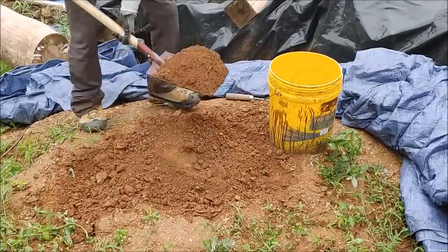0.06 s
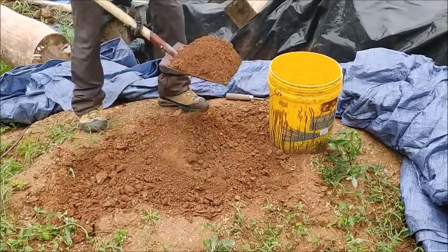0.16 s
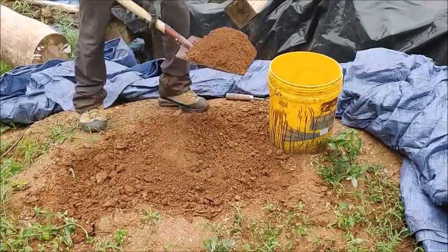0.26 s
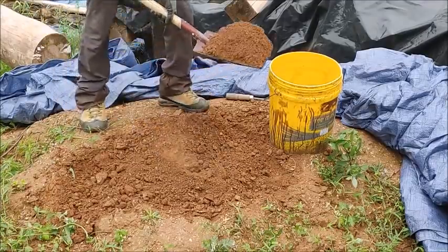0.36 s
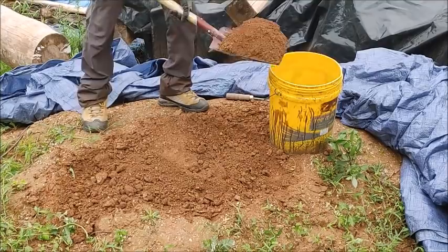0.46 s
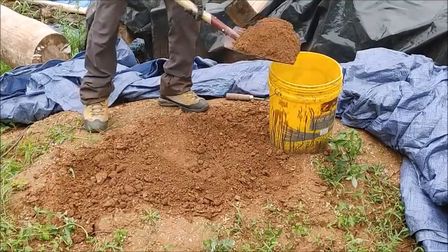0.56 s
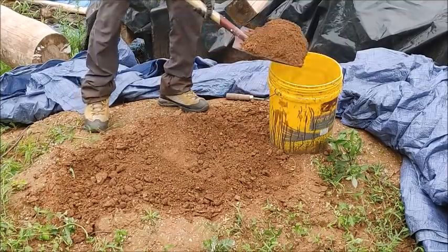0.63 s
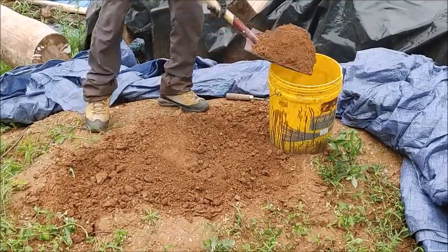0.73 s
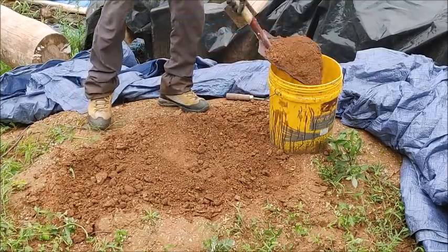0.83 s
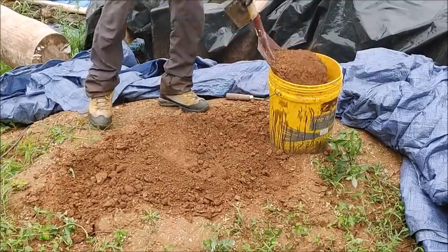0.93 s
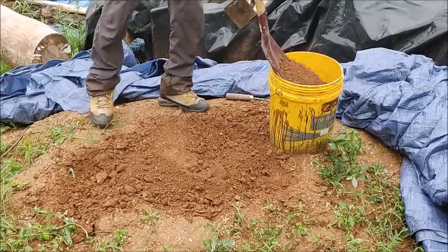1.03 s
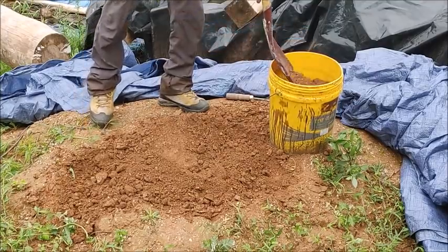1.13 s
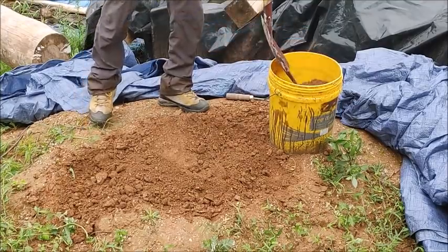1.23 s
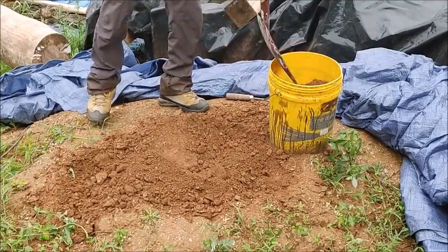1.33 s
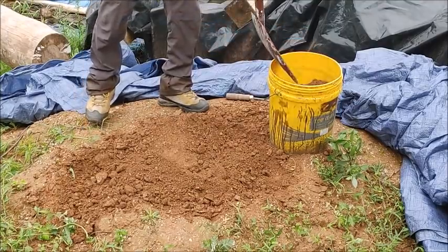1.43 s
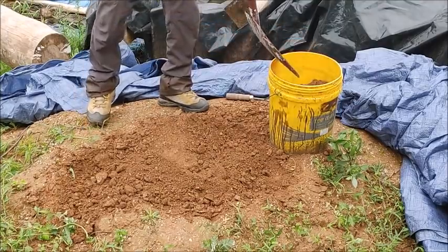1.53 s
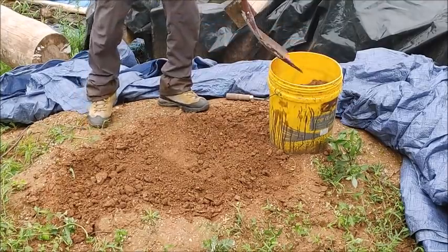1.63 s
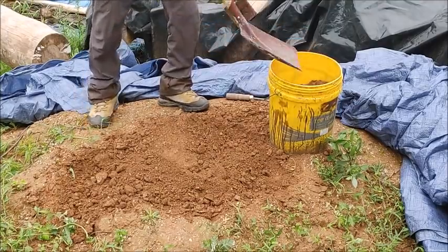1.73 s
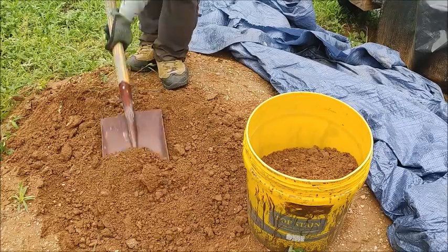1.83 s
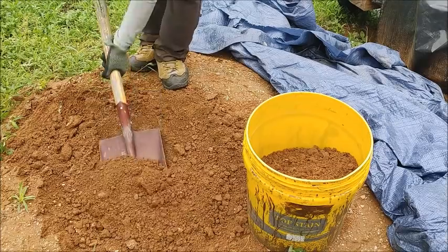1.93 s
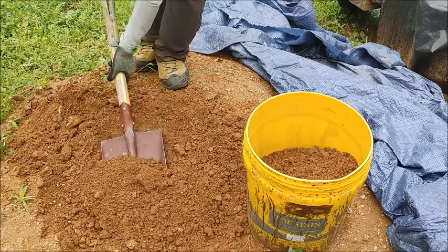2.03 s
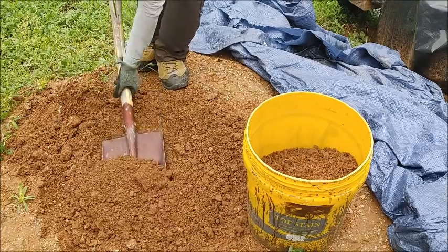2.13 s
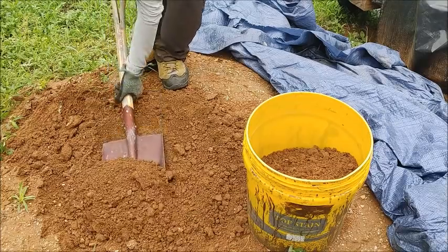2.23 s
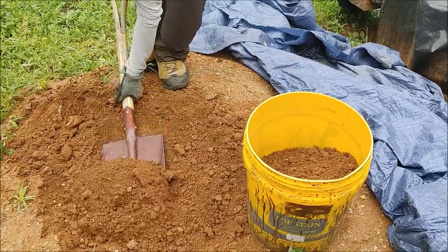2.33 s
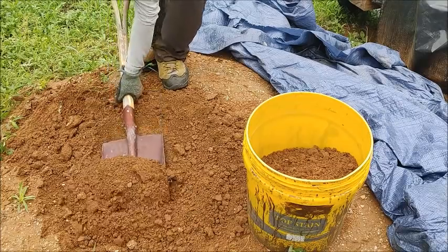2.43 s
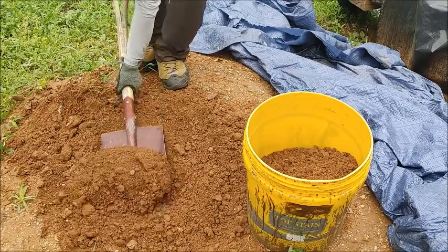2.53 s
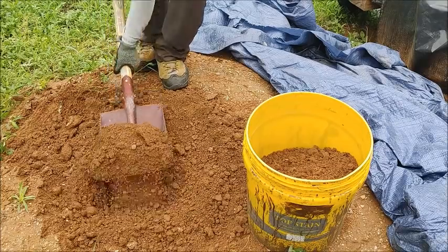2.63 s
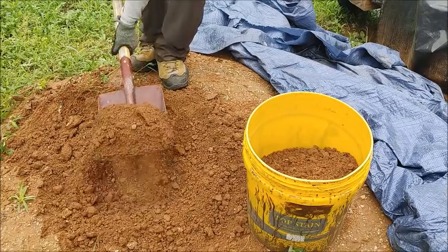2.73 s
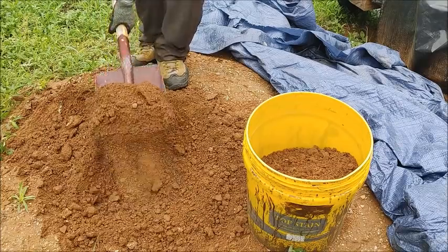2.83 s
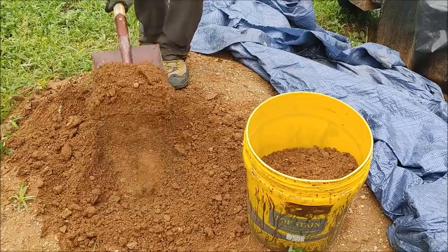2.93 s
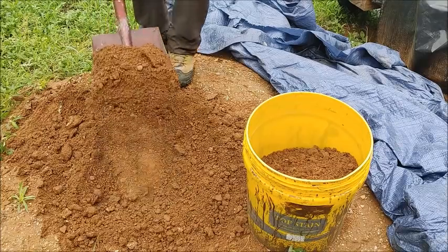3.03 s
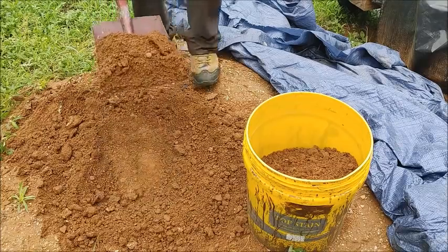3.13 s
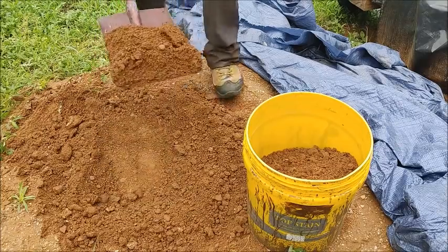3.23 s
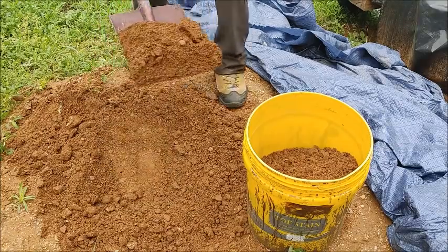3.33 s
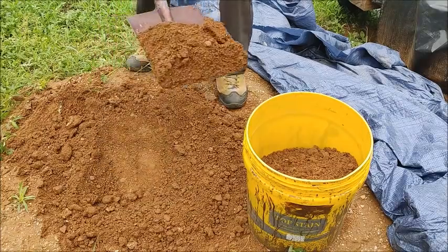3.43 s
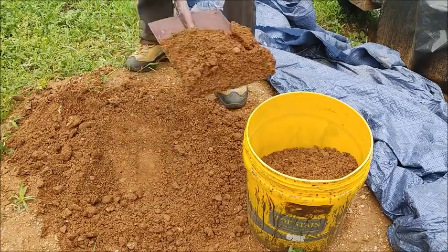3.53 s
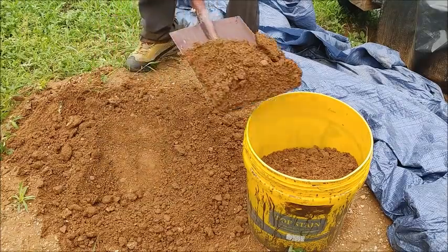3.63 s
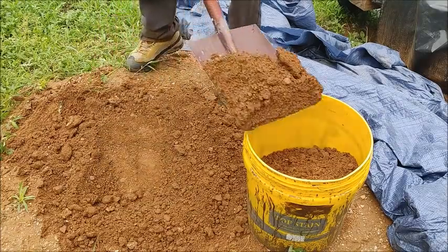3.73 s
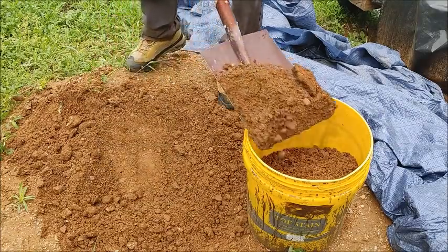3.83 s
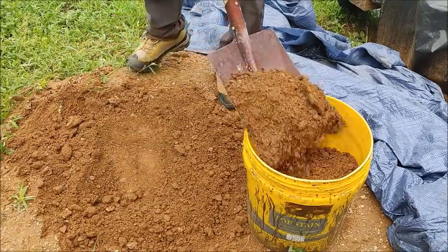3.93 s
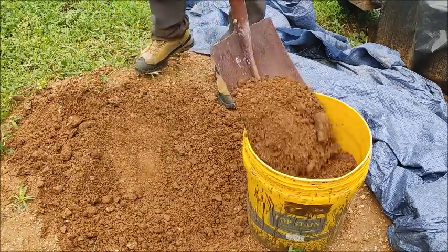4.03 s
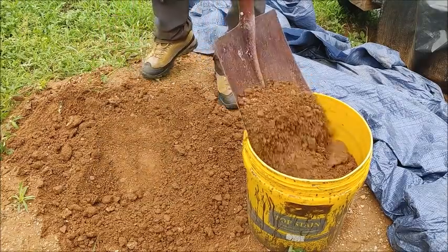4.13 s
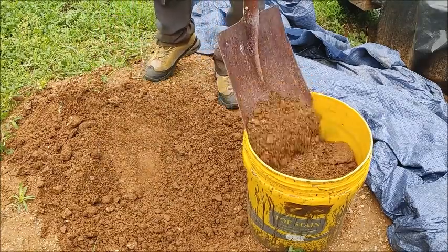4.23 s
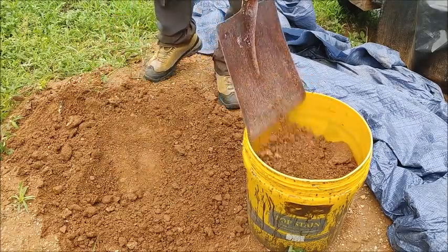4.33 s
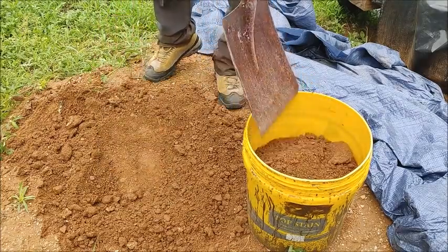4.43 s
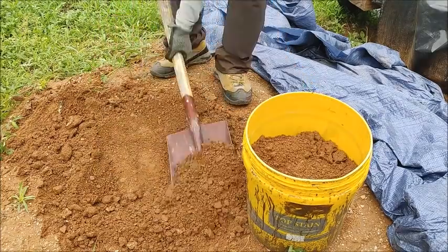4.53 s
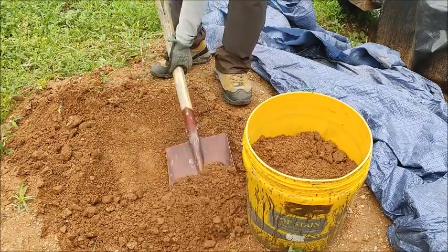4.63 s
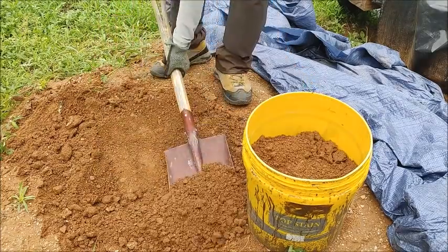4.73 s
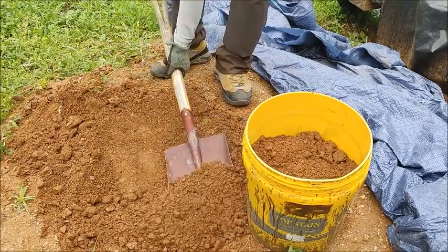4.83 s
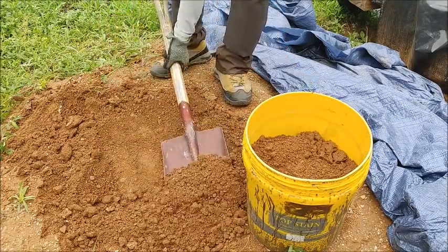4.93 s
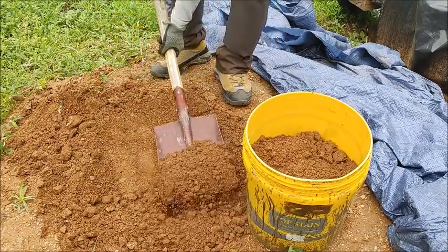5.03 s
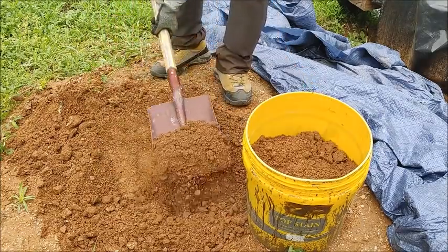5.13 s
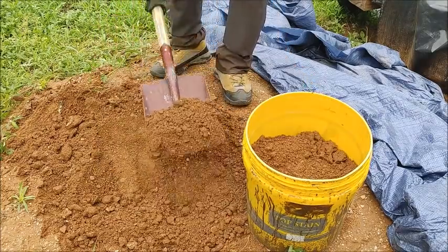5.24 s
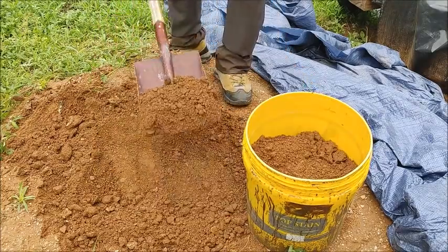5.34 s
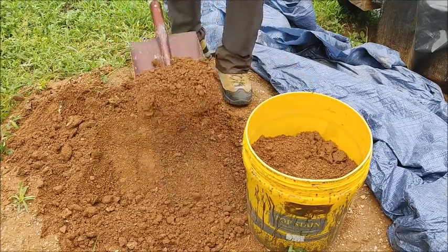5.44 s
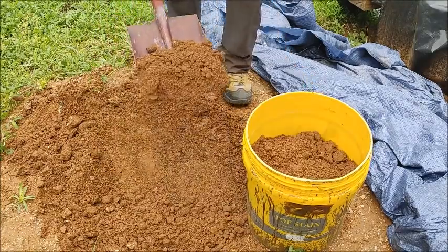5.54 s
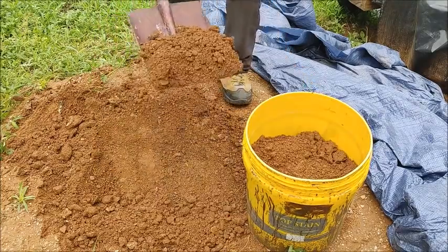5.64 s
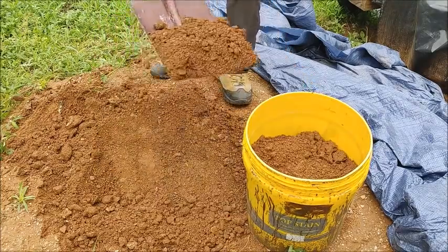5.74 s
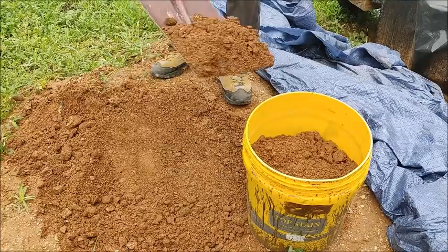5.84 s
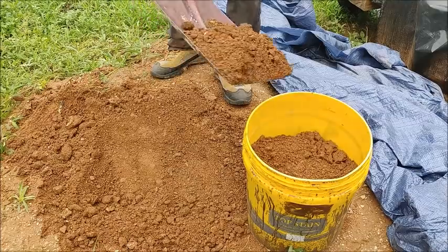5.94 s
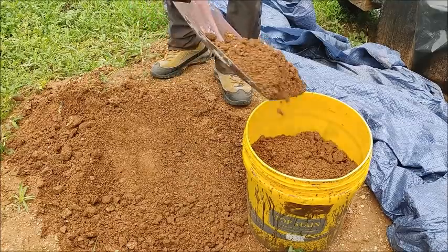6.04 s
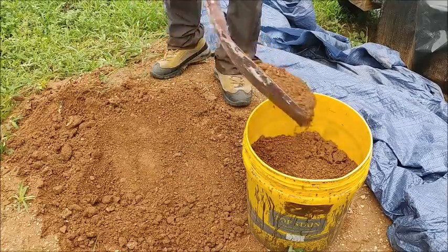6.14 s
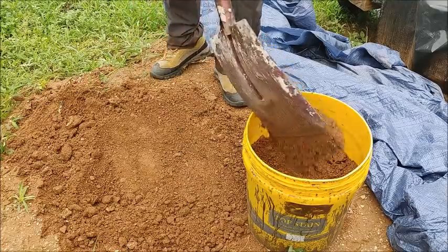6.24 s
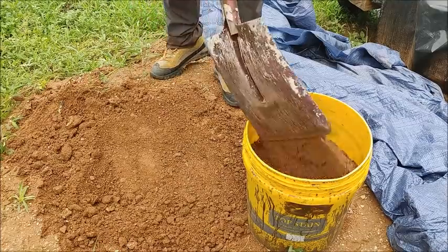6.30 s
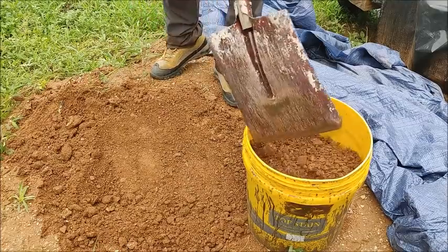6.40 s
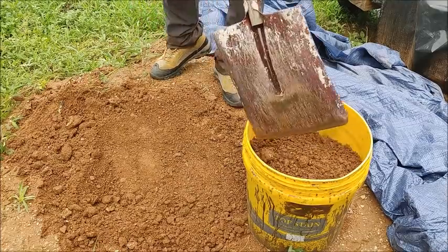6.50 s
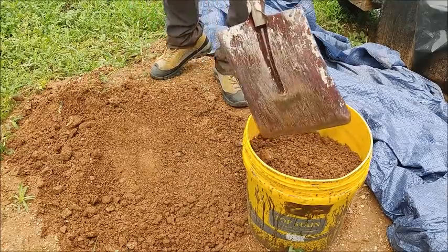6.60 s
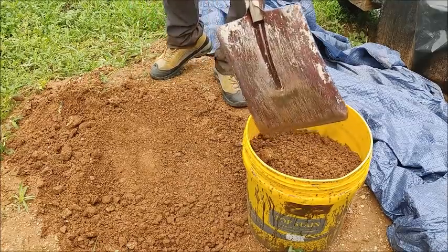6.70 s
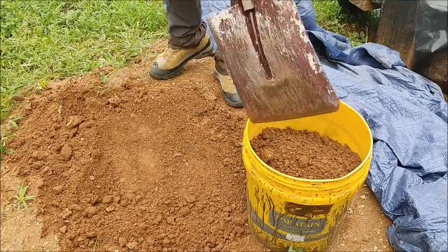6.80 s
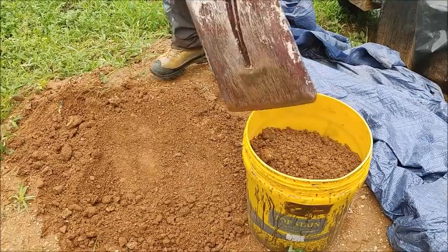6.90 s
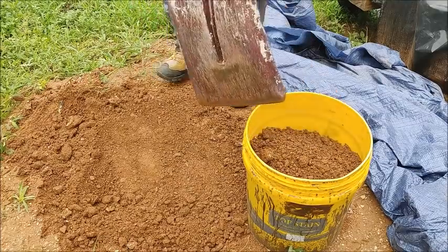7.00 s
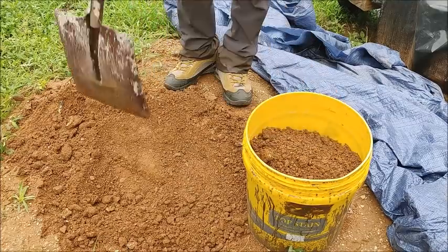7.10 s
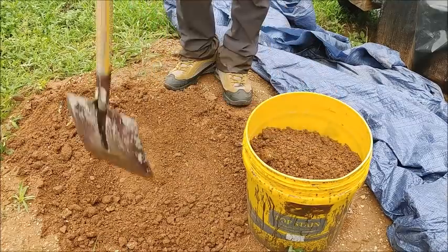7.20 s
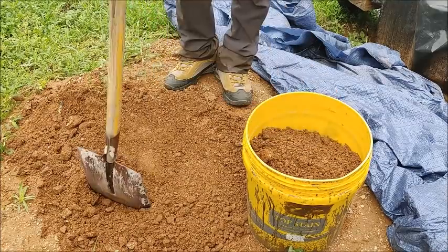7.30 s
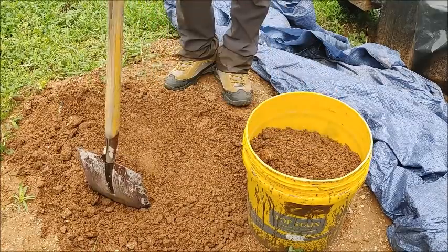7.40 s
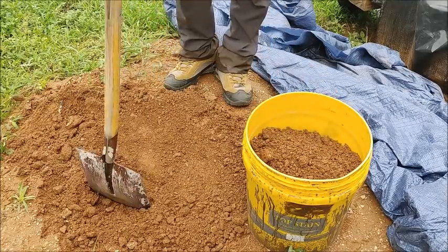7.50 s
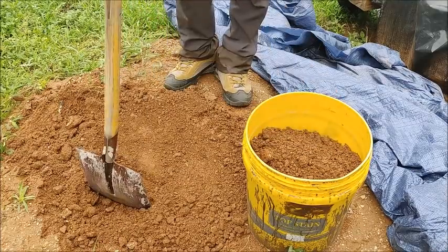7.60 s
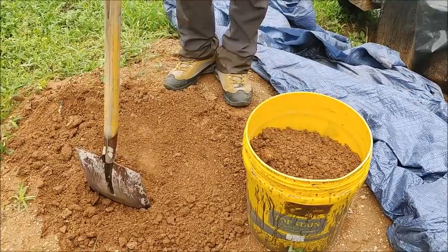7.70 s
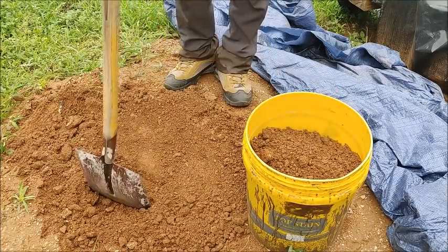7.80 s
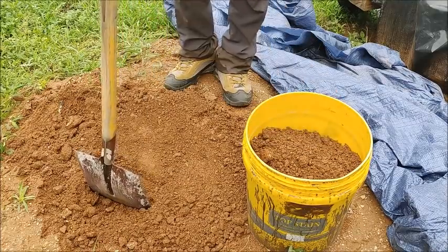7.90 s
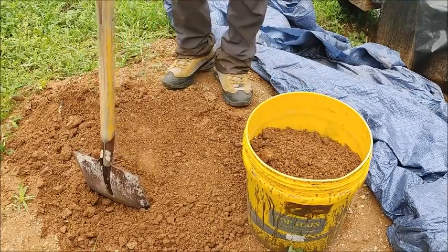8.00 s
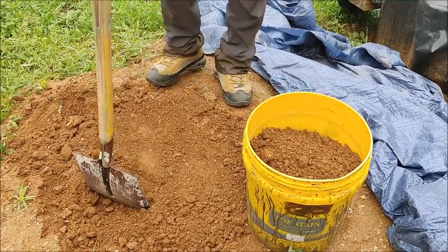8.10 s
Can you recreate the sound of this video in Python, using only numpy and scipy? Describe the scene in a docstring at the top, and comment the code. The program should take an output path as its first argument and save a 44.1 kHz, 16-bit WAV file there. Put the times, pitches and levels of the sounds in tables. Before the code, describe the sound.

Fine insect trilling and a soft airy chorus fill an open yard. In front, three shovel loads of dry soil slide from steel and rattle into a plastic bucket, with small clods knocking and clacking. After each pour the blade crunches into sandy soil; the first and last thrusts scrape over stones, the middle one is softer. A faint metallic ring trails the third pour. Near, dry sound with little echo.

```python
"""Outdoors, a steel shovel tips three loads of dry sandy soil into a plastic bucket, and digs in after each.
Clumped random clicks, coloured and resonated, make the hiss of soil, its patter and the rasp of the thrusts.
Lumps thud and knock as short bursts of such clicks; decaying sines ring the emptied blade and jolt the shovel.
Insects trill in narrow noise bands chopped by wing strokes, over a streaky hiss of a distant chorus that now
and then swells near 1.6 kHz, and a few faint far calls of swelling narrow noise."""
import sys
import numpy as np
from scipy import signal
from scipy.io import wavfile
from scipy.ndimage import uniform_filter1d

SR = 44100
rng = np.random.default_rng(int(sys.argv[2]) if len(sys.argv) > 2 else 0)


def dump_mix(stems):
    """Bounce the given channels to the path in sys.argv[1] as a 16-bit WAV at rate SR."""
    frames = np.atleast_2d(stems).T  # one column per channel
    limited = np.clip(frames, -1, 1)  # hard clip at full scale
    pcm = np.round(limited * 32767).astype(np.int16)
    wavfile.write(sys.argv[1], SR, pcm)


N = 359856
TIME = np.arange(N) / SR  # seconds
EDGE_HZ = 15850  # upper band limit of the whole scene

# near insects: (start [s], pitch [Hz], band width [Hz], mean wing stroke rate [1/s], level before panning [dB])
INSECTS = [(-1, 6310, 190, 27.1, -62), (1.8, 6280, 80, 27.25, -59.5), (1.67, 6675, 46, 26.2, -62),
           (0.71, 6330, 440, 16, -65.5)]
STROKE_DEPTH, STROKE_SHARPNESS = .7, 2.5  # share of the amplitude that pulses, and how peaked each pulse is
STROKE_EVENNESS = .8  # 0 keeps the noise's own swells, 1 flattens them

# colour of the far chorus: (frequency [Hz], relative density [dB per Hz])
CHORUS_COLOUR = [(30, -16.5), (110, -27.5), (270, -17), (1270, -18.5), (1420, -5), (1620, -3.5), (2150, -7),
                 (2900, -0.5), (3600, -1), (4000, 3.5), (4450, -2), (5300, -6.5), (6400, -1), (7400, -11),
                 (8600, 1.5), (9400, -7.5), (12000, -13), (12800, -23.5), (15500, -25.5)]
# gain of the chorus's top treble: (time [s], gain [dB])
SHEEN = [(0, -14), (.45, -7.5), (.65, -1.5), (1.5, -9.5), (1.9, -0.5)]
CHORUS_DB = -55
SWELL_DB, SWELLS_PER_S = 0.51, 2.2  # the chorus wavers slowly

# faint far calls, perhaps of birds, and two brief swells of the far chorus near 1.6 kHz: (time [s], length [s],
# pitch [Hz], band width [Hz], level before the swell [dB])
FAR_CALLS = [(0.419, 0.11, 4400, 300, -58.5), (1.297, 0.18, 4530, 506, -58), (1.793, 0.15, 4640, 400, -59),
             (2.728, 0.27, 1635, 100, -64), (4.774, 0.25, 2360, 25, -65), (5.199, 0.25, 1640, 120, -66),
             (7.625, 0.22, 3900, 201, -65), (7.637, 0.19, 4600, 400, -59)]

# soil slips off the tilted blade, each load in two parts; levels are before the mix:
# (time [s], rise [s], slide run-out [s], slide [dB], patter on the wall [dB], patter on the bottom [dB])
POURS = [(.89, 0.17, 0.41, -53.5, -61, -53), (1.16, 0.057, 0.33, -59, -67, -73),
         (3.983, 0.076, 0.37, -52.5, -48, -50), (4.11, 0.15, 0.65, -51.5, -51, -49),
         (6.193, 0.1, 0.45, -49.5, -59.5, -53), (6.384, 0.025, 0.37, -52.5, -49, -70)]
RUN_OUT_SHAPE = 1.84  # the flow holds at first, then dwindles fast
FALL_S = 0.15  # from the blade to the bottom of the bucket
SETTLE = 0.76  # length of the bottom patter's ending relative to the slide's
LUMPY_DB, LUMPS_PER_S = 2.2, 45  # the soil arrives in uneven lumps
SPURT_DB, SPURTS_PER_S = 1.1, 110  # it leaves the blade in small spurts
# colour of the sliding soil, also of the clods' ticks: (frequency [Hz], relative density [dB per Hz])
SLIDE_COLOUR = [(300, -44), (1100, -18.5), (1700, 4), (2800, 4.5), (4200, 2), (6300, 0), (7400, -2),
                (8500, 2.5), (11700, -2.5), (13000, -16.5), (15500, -17.5)]
# colour of soil in the hollow bucket: (frequency [Hz], relative density [dB per Hz])
HOLLOW_COLOUR = [(150, -30), (400, -17), (630, -20.5), (740, -13), (1130, -6), (1550, 0), (1900, -5.5),
                 (2200, -8), (3200, -1), (4500, -13.5), (8000, -46)]
# modes of the bucket: (pitch before tuning [Hz], width before tuning [Hz], lift [dB])
BUCKET_MODES = [(530, 42, 9.5), (765, 45, 12), (1003, 40, 3), (1285, 42, 7), (1575, 65, 7), (1775, 60, 8.5)]
# the bucket is retuned as it fills: (from time [s], pitch [ratio])
BUCKET_TUNING = [(0, 1.19), (3.5, 1.0), (6, .97)]
# modes of the steel blade, damped by soil: (pitch before tuning [Hz], width before tuning [Hz], lift [dB])
BLADE_MODES = [(472, 43, 9.5), (515, 21, 4.5), (1017, 78, 9), (1890, 20, -12), (2490, 46, 3),
               (2740, 27, -1), (2970, 68, -6), (3140, 120, -2), (3570, 67, 1.5), (3840, 32, -10),
               (3950, 21, 5), (4240, 12, -8), (4200, 34, -16)]
# the load of soil retunes the blade from stroke to stroke: (from time [s], pitch [ratio])
BLADE_TUNING = [(0, 1.04), (1.8, 1.02), (3.5, 1.3), (4.56, 1.05), (6, 1.035), (7.2, 0.96)]

# single crumbs: rate, range of sizes, level within the pour, sharpness and range of their pitches
CRUMBS_PER_S, CRUMB_SPREAD_DB, CRUMB_DB, CRUMB_Q = 300, 12, -2.7, 15
CRUMB_LOW_HZ, CRUMB_HIGH_HZ = 1410, 5160

# a mass of soil lands or stops the blade, or a boot treads:
# (time [s], rise [s], 60 dB decay [s], level before the force's own rms [dB], pitch [Hz])
THUDS = [(1.071, 0.0051, 0.2, -55.5, 217), (1.089, 0.0043, .08, -54.5, 220), (1.173, 0.002, 0.02, -57, 420),
         (1.963, 0.0084, 0.05, -54.5, 315), (3.03, 0.0054, 0.22, -73, 410), (3.362, .003, 0.15, -73, 378),
         (4.072, 0.018, 0.11, -48.5, 333), (4.103, 0.0018, 0.057, -32.5, 295),
         (4.1032, 0.0012, 0.063, -36.5, 600), (4.26, 0.018, 0.08, -58.5, 555),
         (4.41, 0.0097, 0.44, -61, 296), (6.17, .002, 0.044, -72, 530), (6.399, 0.0048, 0.14, -64, 454),
         (6.503, 0.0029, .1, -60, 455), (7.354, 0.0086, 0.1, -46, 343)]
# colour of a soft thud: (frequency [multiple of its pitch], relative density [dB per Hz])
THUD_COLOUR = [(.1, -45), (.48, -16), (.75, 6.5), (1.002, 3), (1.8, -10.5), (3, -21), (8, -41)]

# clods burst on the bucket or under the blade; levels are before the force's own rms:
# (time [s], 60 dB decay [s], knock [dB], knock pitch [Hz], clack [dB], clack pitch [Hz], gritty tick [dB])
CLODS = [(1.089, 0.19, -47, 1230, -52, 3000, -49), (1.173, 0.0081, -34, 1670, -37, 2900, -37.5),
         (1.177, 0.012, -48, 1100, -42, 2930, -44), (1.193, 0.051, -45, 1490, -58, 3300, -55),
         (1.255, 0.089, -46, 2040, -43, 3650, -53), (1.304, 0.071, -46.5, 1520, -45.5, 2790, -65),
         (1.892, 0.037, -33, 1550, -27.5, 2850, -42), (1.936, 0.084, -44, 1750, -37, 2540, -36),
         (1.945, 0.069, -38, 900, -47, 1340, -48), (1.957, .03, -49, 1500, -47, 2700, -46),
         (1.975, 0.054, -39, 940, -39, 1480, -48), (1.987, .03, -49, 905, -49, 1590, -47),
         (4.06, 0.14, -54, 1440, -39.5, 3320, -55), (4.1033, 0.057, -35.5, 1000, -40, 2930, -35),
         (4.298, 0.053, -51, 1740, -47, 2900, -39.5), (4.338, 0.11, -44.5, 1660, -49, 3000, -41),
         (4.4371, 0.02, -32.5, 1320, -34.5, 3600, -43), (4.442, 0.037, -35, 1530, -39, 3170, -48.5),
         (4.461, 0.068, -36.5, 1480, -45, 2985, -58), (4.504, 0.035, -43, 1260, -58, 3000, -60),
         (4.58, 0.053, -44, 1460, -38, 2500, -38), (4.648, 0.047, -54, 780, -55, 1700, -55),
         (4.67, 0.087, -49, 764, -46.5, 1330, -51), (4.71, .06, -55, 750, -58, 2700, -57),
         (4.736, 0.033, -64, 684, -55, 1700, -64), (6.1686, 0.054, -49.5, 1060, -47, 2210, -57),
         (6.177, 0.094, -45.5, 1510, -44, 3200, -54), (6.259, 0.032, -41.5, 1520, -62, 2050, -54),
         (6.399, 0.034, -38, 1594, -48, 4100, -48), (6.422, 0.054, -46, 1780, -54, 2980, -36),
         (6.428, 0.06, -38, 1770, -54, 2830, -34), (6.447, 0.072, -40.5, 1540, -43, 2470, -63),
         (6.49, 0.087, -40.5, 1380, -49, 2100, -59), (6.506, 0.052, -38, 1450, -57, 1880, -37),
         (6.589, 0.016, -52, 1710, -42.5, 3060, -46), (7.359, .06, -35, 1710, -36, 1940, -44),
         (7.391, 0.1, -45.5, 1150, -44, 3100, -42)]
CLOD_Q, CLOD_RISE_S = 6.5, .002

# scrapes that start the ring: (time [s], level [dB])
RING_KNOCKS = [(1.174, -69), (6.32, -47.8)]
# long ring of the blade in free air: (pitch [Hz], level relative to the scrape [dB], 60 dB decay [s])
RING_MODES = [(1669, -9, 1.1), (1814, 2, 1.6), (1836, -4, 1.3), (4020, -19, .55)]
RING_BUILD_S, RING_LAG = .1, 1.6  # build-up time constant; left channel's lead in radians
RING_WAVER, RING_WAVERS_PER_S = .2, 35

# the blade is thrust into the heap; levels are before the mix:
# (time [s], rise [s], at full speed [s], 60 dB slowing [s], time until rest [s],
#  sand rasp [dB], crumb crunch [dB], blade push [dB])
THRUSTS = [(1.874, 0.001, 0.076, 0.17, 0.13, -29.5, -32.5, -42),
           (4.576, 0.0025, 0.036, 0.41, 0.17, -34, -35, -49.5),
           (7.345, 0.0099, 0.014, 0.097, 0.09, -26.5, -29.5, -34)]
# the edge strikes or grates over a stone: (time [s], rise [s], 60 dB decay [s], level before the mix [dB])
STONES = [(1.8752, .0004, .012, -30), (1.8912, 0.00033, .004, -15), (1.891, 0.0028, 0.022, -19.5),
          (1.8957, .0003, 0.0037, -16), (1.9004, .001, 0.0087, -20), (4.579, .001, .02, -35),
          (4.587, 0.0012, .012, -30), (7.354, 0.0027, .02, -19.5), (7.363, .0006, .008, -16),
          (7.364, 0.0049, 0.033, -15)]
DRAG_S = 0.0052  # crunch and push hold this much longer than the rasp
BURY = 0.11  # crunch and push build as the blade goes deeper, over this share of its time at full speed
REST_T60_S = 0.078  # they cease when the blade comes to rest
CATCH_DB, CATCHES_PER_S = 3.0, 170  # the blade catches and slips as it goes in
GRIT_DB = -6.5  # single crumbs within the crunch
# colour of sand on steel: (frequency [Hz], relative density [dB per Hz])
RASP_COLOUR = [(1200, -49), (3000, -5.5), (4000, -0.5), (6200, 3.5), (7400, -2.5), (8500, 5.5),
               (11700, 2.5), (13000, -7), (15500, -13)]
# colour of breaking crumbs: (frequency [Hz], relative density [dB per Hz])
CRUNCH_COLOUR = [(150, -46), (450, -16), (700, 1.5), (1000, -4.5), (1200, -3), (1600, 1.5), (2700, 2),
                 (3800, -2.5), (6000, -19)]
# colour of the low push of the blade: (frequency [Hz], relative density [dB per Hz])
PUSH_COLOUR = [(30, -30), (130, -21), (230, 6.5), (320, 5), (430, -5.5), (560, 7), (800, -32), (2000, -28)]

# faint scuffs and squeaks of boots and shovel:
# (time [s], rise [s], 60 dB decay [s], level [dB], pitch [Hz], width [Hz])
SCUFFS = [(2.886, 0.011, .06, -50, 9900, 4600), (2.925, 0.02, 0.11, -54.5, 2400, 230),
          (3.03, 0.007, 0.089, -55, 920, 320), (3.06, 0.0063, 0.12, -60, 754, 700),
          (3.085, 0.022, 0.13, -63.5, 1040, 45), (6.272, 0.034, 0.55, -47.5, 2744, 36),
          (6.29, 0.034, 0.7, -56, 2510, 36)]

# jerks of the buried blade: (time [s], rise [s], level before panning [dB], centre pitch [Hz])
JOLTS = [(7.353, 0.011, -36, 570), (7.372, 0.0061, -33, 438), (7.398, 0.0029, -36.5, 385)]
# low modes of the whole shovel: (pitch [Hz], level relative to the jolt [dB], 60 dB decay [s])
SHAFT_MODES = [(283, -3, .085), (410, 4, 0.048), (548, 0, 0.081), (738, -4, .07), (900, 2, 0.055)]
JOLT_SPREAD = 0.43  # octaves around its own pitch that a jolt shakes


def gain_of(db):
    """Decibels to amplitude."""
    return 10 ** (np.asarray(db) / 20)


def evened(x):
    """Scales to rms 1."""
    return x / np.sqrt(np.mean(x ** 2) + 1e-20)


def decay(t, t60):
    """Exponential decay, 60 dB down at t60."""
    return np.exp(-np.log(1000) * t / t60)


def read(points, hz):
    """Reads a spectrum table on a log-frequency axis."""
    f, value = np.transpose(points)
    return np.interp(np.log(hz + 1), np.log(f + 1), value)


def drift(per_s, t=TIME):
    """Smooth random wander: normal draws at the given rate, joined by straight lines."""
    return np.interp(t * per_s, np.arange(4096), rng.standard_normal(4096))


def colour(x, points):
    """Causal minimum-phase filter of energy 1 with the given spectrum."""
    log_gain = np.log(gain_of(read(points, abs(np.fft.fftfreq(2048, 1 / SR)))))
    response = np.exp(np.conj(signal.hilbert(log_gain)))
    taps = np.fft.ifft(response).real[:1024]
    return signal.oaconvolve(x, taps[None] / np.linalg.norm(taps), axes=1)[:, :N]


def resonate(x, hz, width):
    """A two-pole resonance that keeps the power of white noise."""
    b, a = signal.iirpeak(hz, hz / width, fs=SR)
    return signal.lfilter(b, a, x) * np.sqrt(SR / (np.pi * width))


def ringing(x, modes, tuning):
    """A body lifts the sound at each of its modes, tuned anew for each stroke."""
    starts, ratios = np.transpose(tuning)
    strokes = np.split(x, (starts[1:] * SR).astype(int), axis=1)
    bodies = []
    for part, ratio in zip(strokes, ratios):
        body = part.copy()
        for hz, width, db in modes:
            b, a = signal.iirpeak(hz * ratio, hz / width, fs=SR)
            body += gain_of(db) * signal.lfilter(b, a, part)
        bodies.append(body)
    return np.hstack(bodies)


def surge(s, rise, fall, shape=1, hold=0):
    """Force that builds from s, holds, and is 60 dB down after fall; shape 1 dies away, 2 lingers then stops."""
    out, rise, first = np.zeros(N), max(rise, 1e-4), int(s * SR)
    t = TIME[:min(int((rise + hold + 2 * fall) * SR), N - first)]
    build = np.minimum(t / rise, 1) ** 2
    falling = np.maximum(t - rise - hold, 0) / fall
    out[first:first + len(t)] = build * np.exp(-np.log(1000) * falling ** shape)
    return out


def grains(per_s, spread_db, clump_db, scatter_s=.0006):
    """Clumped clicks of unequal size; each reaches the two channels with its own delays and signs."""
    chance = rng.random((6, N), dtype=np.float32)
    at = np.flatnonzero(chance[0] < per_s / SR)
    heft, sign, lag = chance[1, at], np.sign(chance[2:4, at] - .5), chance[4:, at]
    heft_db = spread_db * np.minimum(-np.log1p(-heft), 4)
    size = gain_of(heft_db + clump_db * drift(300, at / SR))
    arrival = (at + (lag * scatter_s * SR).astype(int)) % N
    return evened(np.array([np.bincount(i, size * s, N) for i, s in zip(arrival, sign)]))


def panned(x, left_db):
    """Leans a sound to the left by a level difference between the channels."""
    return x * gain_of(np.array([left_db, -left_db]).reshape(2, -1) / 2)


def insects(rate_wander=0.0044):
    """Each wing stroke drags a file across a scraper and sounds a narrow wing resonance."""
    out = np.zeros((2, N))
    for start, hz, width, rate, db in INSECTS:
        turns = np.cumsum(rate * (1 + rate_wander * drift(3.9))) / SR
        pulse = abs(np.sin(np.pi * turns)) ** (2 * STROKE_SHARPNESS)
        stroke = 1 - STROKE_DEPTH + STROKE_DEPTH * pulse
        tone = resonate(resonate(rng.standard_normal((2, N)), hz, width), hz, 4 * width)
        envelope = abs(signal.hilbert(tone)) + 1e-9
        wing = stroke * tone / envelope ** STROKE_EVENNESS  # strokes of nearly equal strength
        fade_in = np.clip((TIME - start) * 10, 0, 1)
        out += gain_of(db) * evened(wing) * fade_in
    return panned(out, left_db=1.0)


def chorus(streak_db=3.9, patchy_db=1.1, treble_streak_db=3.5):
    """Many far insects and leaves merge into a hiss full of short thin streaks."""
    frames, hz = N // 512 + 5, np.fft.rfftfreq(2048, 1 / SR)
    real, imag = rng.standard_normal((2, 2, frames, len(hz)))

    def blotches(in_time, in_pitch):
        """Random texture smoothed over frames and frequency bins."""
        smooth = uniform_filter1d(rng.standard_normal(real.shape[1:]), size=in_time, axis=0)
        return evened(uniform_filter1d(smooth, size=in_pitch, axis=1))

    streaks = np.interp(hz, [4500, 7000], [streak_db, treble_streak_db]) * blotches(6, 2)
    patches = patchy_db * blotches(16, 14)
    sheen_db = np.interp(np.arange(frames) * 512 / SR, *np.transpose(SHEEN))
    top_db = sheen_db[:, None] * np.interp(hz, [8500, 11000], [0, 1])
    z = (real + 1j * imag) * gain_of(read(CHORUS_COLOUR, hz) + streaks + patches + top_db)
    hiss = evened(signal.istft(z.swapaxes(1, 2), nperseg=2048, noverlap=1536)[1][:, :N])
    return panned(hiss, left_db=.5) * gain_of(CHORUS_DB + SWELL_DB * drift(SWELLS_PER_S))


def far_calls():
    """Distance blurs each call into a soft narrow swell."""
    out = np.zeros((2, N))
    for s, length, hz, width, db in FAR_CALLS:
        noise = rng.standard_normal((2, SR // 2))
        tone = evened(resonate(resonate(noise, hz, width), hz, 3 * width))
        swell = np.sin(np.pi * np.clip(TIME[:SR // 2] / length, 0, 1))
        part = out[:, int(s * SR):][:, :SR // 2]
        part += (gain_of(db) * swell * tone)[:, :part.shape[1]]
    return out


def crumbs():
    """Separate crumbs land at random, each on its own spot with its own short ring."""
    t = TIME[:SR // 40]
    out = np.zeros((2, N + len(t)))
    for when, heft, spot, left, right in rng.random((int(CRUMBS_PER_S * N / SR), 5)):
        hz = CRUMB_LOW_HZ * (CRUMB_HIGH_HZ / CRUMB_LOW_HZ) ** spot
        tone = np.sin(2 * np.pi * (hz * t + np.array([[left], [right]])))
        tick = np.minimum(hz * t / 2, 1) * np.exp(-np.pi * hz * t / CRUMB_Q) * tone
        out[:, int(when * N):][:, :len(t)] += gain_of(CRUMB_SPREAD_DB * heft) * tick
    return evened(out[:, :N])


def pours():
    """Fine soil slides off the steel and patters on wall, then bottom, of the hollow bucket, with small lumps."""
    flow, rattle = np.zeros((2, N))
    for s, rise, run_out, slide_db, wall_db, bottom_db in POURS:
        leaving = surge(s, rise, run_out, RUN_OUT_SHAPE)
        landing = surge(s + FALL_S, rise, SETTLE * run_out, RUN_OUT_SHAPE)
        flow = np.hypot(flow, gain_of(slide_db) * leaving)
        patter_force = np.hypot(gain_of(wall_db) * leaving, gain_of(bottom_db) * landing)
        rattle = np.hypot(rattle, patter_force)
    spurts = evened(gain_of(SPURT_DB * drift(SPURTS_PER_S)))
    sliding = flow * spurts * grains(per_s=5000, spread_db=0.0, clump_db=0.5)
    slide = ringing(colour(sliding, SLIDE_COLOUR), BLADE_MODES, BLADE_TUNING)
    lumps = evened(gain_of(LUMPY_DB * drift(LUMPS_PER_S)))
    falling = rattle * lumps * grains(per_s=1200, spread_db=1.5, clump_db=1)
    patter = ringing(colour(falling, HOLLOW_COLOUR), BUCKET_MODES, BUCKET_TUNING)
    ticks = gain_of(CRUMB_DB) * np.hypot(flow, rattle) * crumbs()
    return panned(gain_of(7) * slide + gain_of(-2.5) * patter + ticks, left_db=1.0)


def thuds():
    """A soft mass stops on loose soil: a broad low push with no ring."""
    out = np.zeros((2, N))
    push = grains(per_s=7000, spread_db=1.2, clump_db=.5)
    for s, rise, t60, db, hz in THUDS:
        part = slice(int(s * SR), int(s * SR) + SR // 2)
        force = surge(s, rise, t60)[part]
        blow = colour(push[:, part] * force, np.array(THUD_COLOUR) * [hz, 1])[:, :SR // 2]
        out[:, part] += gain_of(db) * np.sqrt(np.mean(force ** 2)) * evened(blow)
    return out


def clods():
    """Each clod knocks at two pitches of the spot it meets, and bursts into grit."""
    out, length = np.zeros((2, N)), SR // 4
    grit = grains(per_s=9000, spread_db=1.4, clump_db=.7)
    for s, t60, knock_db, knock_hz, clack_db, clack_hz, tick_db in CLODS:
        part = slice(int(s * SR), int(s * SR) + length)
        force = surge(s - CLOD_RISE_S / 2, CLOD_RISE_S, t60)[part]
        blow = grit[:, part] * force
        burst = gain_of(tick_db) * evened(colour(blow, SLIDE_COLOUR)[:, :length])
        for db, hz in [(knock_db, knock_hz), (clack_db, clack_hz)]:
            knock = resonate(resonate(blow, hz, hz / CLOD_Q), hz, hz)
            burst += gain_of(db) * evened(knock)
        out[:, part] += np.sqrt(np.mean(force ** 2)) * burst
    return out


def ring():
    """The emptied blade rings on, wavering as it is swung; a close pair of modes beats."""
    out, t = np.zeros((2, N)), np.arange(SR) / SR
    for s, level_db in RING_KNOCKS:
        for hz, db, t60 in RING_MODES:
            phase = 2 * np.pi * (hz * t + rng.random()) + np.array([[RING_LAG], [0]])
            waver = drift(RING_WAVERS_PER_S, t) * np.sin(phase) + drift(RING_WAVERS_PER_S, t) * np.cos(phase)
            tone = np.sin(phase) + RING_WAVER * waver
            build = 1 - np.exp(-t / RING_BUILD_S)
            out[:, int(s * SR):][:, :SR] += gain_of(level_db + db) * build * decay(t, t60) * tone
    return out


def thrusts():
    """Sand rasps along the steel; as the blade sinks, crumbs break and the push shakes it."""
    rasp, crunch, push = np.zeros((3, N))
    for s, rise, hold, t60, travel, rasp_db, crunch_db, push_db in THRUSTS:
        depth = 1 - np.exp(-np.maximum(TIME - s, 0) / (BURY * hold))
        moving = surge(s, 0, REST_T60_S, hold=travel)
        drag = surge(s, rise, t60, hold=hold + DRAG_S) * moving * np.sqrt(depth)
        rasp += gain_of(rasp_db) * surge(s, rise, t60, hold=hold)
        crunch += gain_of(crunch_db) * drag
        push += gain_of(push_db) * drag
    for s, rise, t60, db in STONES:
        rasp = np.hypot(rasp, gain_of(db) * surge(s, rise, t60))
    catch = evened(gain_of(CATCH_DB * drift(CATCHES_PER_S)))
    sand = colour(rasp * np.sqrt(catch) * grains(per_s=15000, spread_db=0.0, clump_db=1.4), RASP_COLOUR)
    breaking = colour(crunch * catch * grains(per_s=6000, spread_db=1.5, clump_db=-1.5), CRUNCH_COLOUR)
    breaking += gain_of(GRIT_DB) * crunch * crumbs()
    shake = colour(push * grains(per_s=4900, spread_db=1.0, clump_db=-0.5), PUSH_COLOUR)
    left_db = np.interp(TIME, [2, 4.6, 7.3], [2.2, .5, 3.0])  # where the blade enters the heap
    along_steel = panned(gain_of(-4.0) * sand, left_db)
    in_heap = panned(gain_of(-5.5) * breaking + gain_of(-12.0) * shake, left_db=1.0)
    return ringing(along_steel + in_heap, BLADE_MODES, BLADE_TUNING)


def scuffs():
    """Brief rubs, each in one resonance."""
    out = np.zeros((2, N))
    rub = grains(per_s=5500, spread_db=2.4, clump_db=1.5)
    for s, rise, t60, db, hz, width in SCUFFS:
        out += gain_of(db) * resonate(rub * surge(s, rise, t60), hz, width)
    return out


def jolts():
    """The buried blade stops in jerks, and the whole shovel shudders at its low modes."""
    out, t = np.zeros((2, N)), np.arange(SR // 4) / SR
    for s, rise, level_db, pitch in JOLTS:
        for hz, db, t60 in SHAFT_MODES:
            share = np.exp(-(np.log2(hz / pitch) / JOLT_SPREAD) ** 2 / 2)
            phase = 2 * np.pi * rng.random() + np.array([[2], [0]])  # earlier on the left
            swing = np.minimum(t / rise, 1) * decay(np.maximum(t - rise, 0), t60)
            tone = np.sin(2 * np.pi * hz * t + phase)
            out[:, int(s * SR):][:, :len(t)] += gain_of(level_db + db) * share * swing * tone
    return panned(out, left_db=1.5)


def yard(x, echo_db=-10, wet_db=-24, t60=0.29):
    """A few quick reflections from ground, bucket and legs, with a faint short tail."""
    t = np.arange(SR // 4) / SR
    tail = rng.standard_normal((2, len(t))) * decay(t, t60) * (t > .003)
    tail *= gain_of(wet_db) / np.linalg.norm(tail[0])
    at = (rng.uniform(.002, .011, (2, 4)) * SR).astype(int)
    np.put_along_axis(tail, at, gain_of(echo_db) / 2, axis=1)  # four echoes share the echo power
    return x + signal.oaconvolve(x, tail, axes=1)[:, :N]


def scene():
    """The digging in front, the insects all around."""
    digging = pours() + thuds() + clods() + ring() + thrusts() + scuffs() + jolts()
    return insects() + chorus() + far_calls() + yard(digging)


def record(dry):
    """Limits the band with a steep low-pass."""
    low_pass = signal.firwin(511, EDGE_HZ, window=("kaiser", 9), fs=SR)
    return signal.oaconvolve(dry, low_pass[None], "same")


dry = scene()
out = record(dry)
dump_mix(out)
```